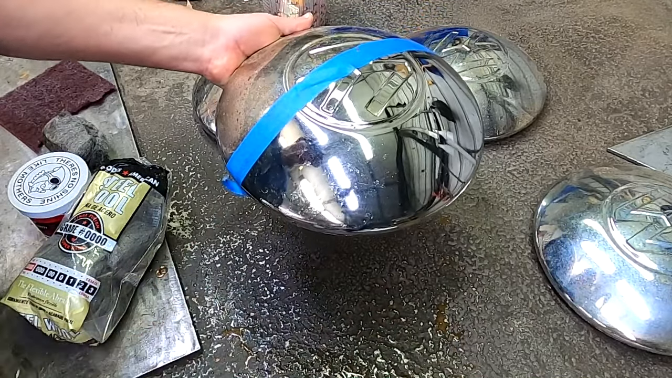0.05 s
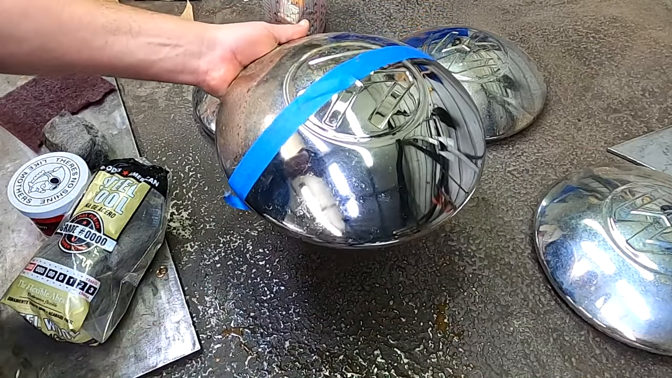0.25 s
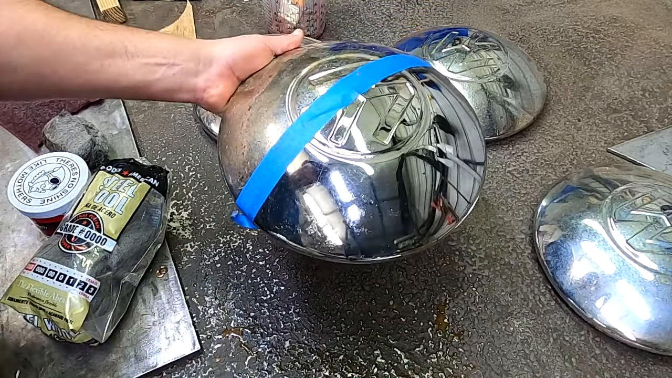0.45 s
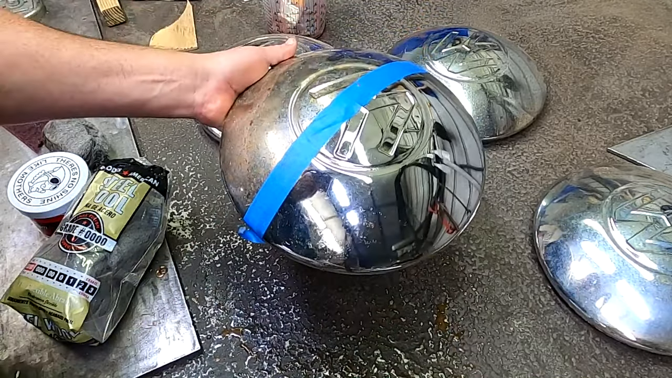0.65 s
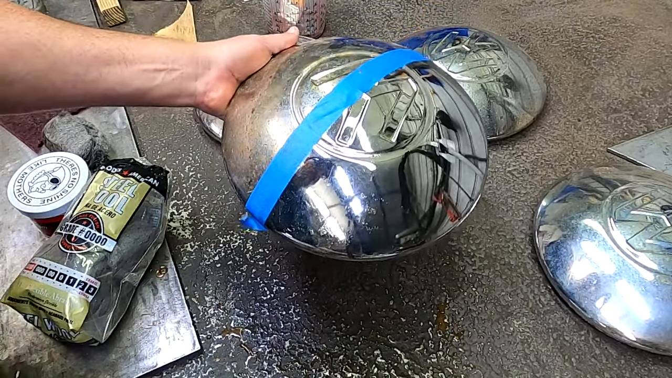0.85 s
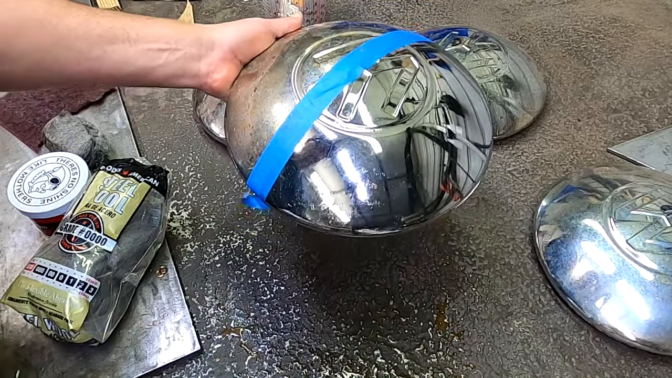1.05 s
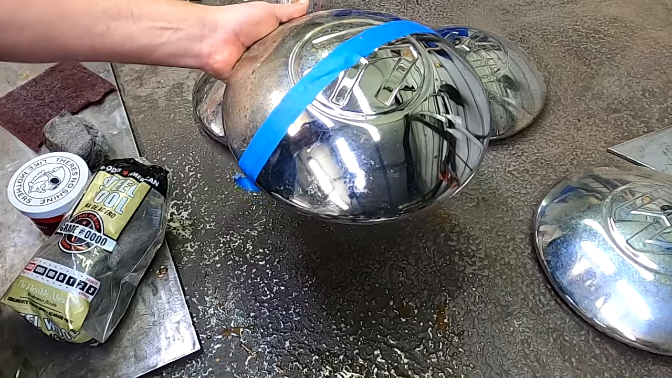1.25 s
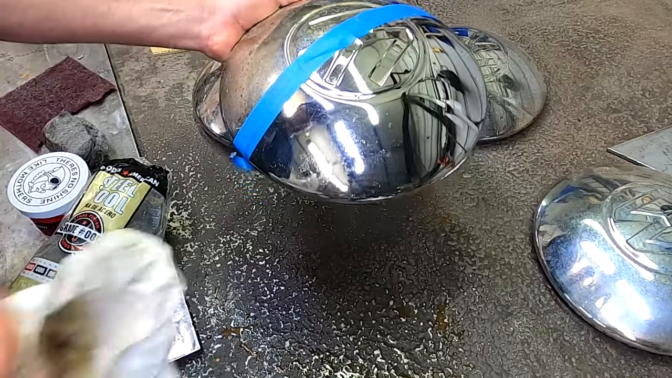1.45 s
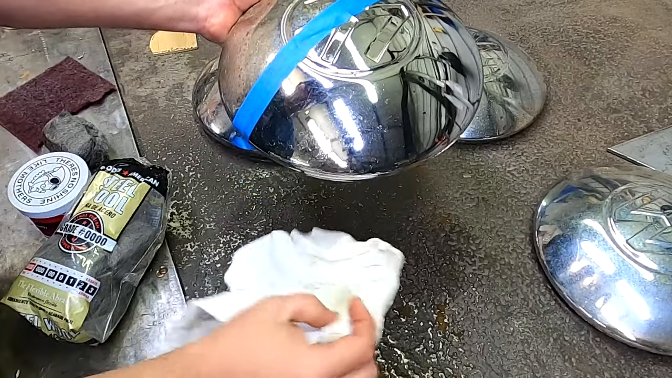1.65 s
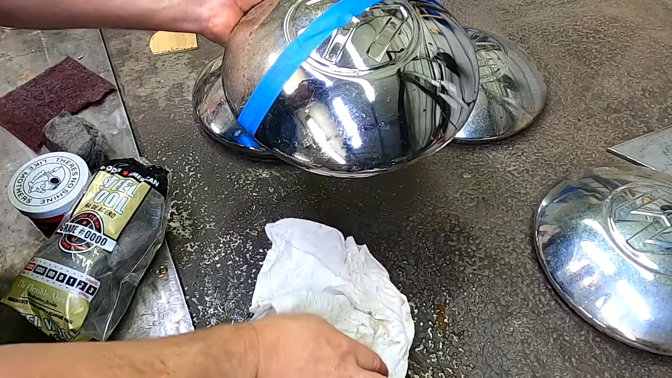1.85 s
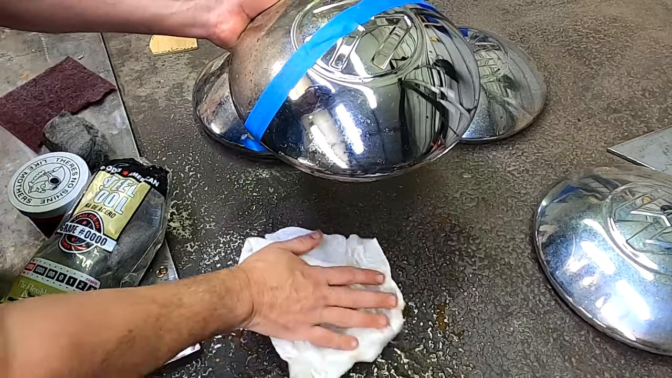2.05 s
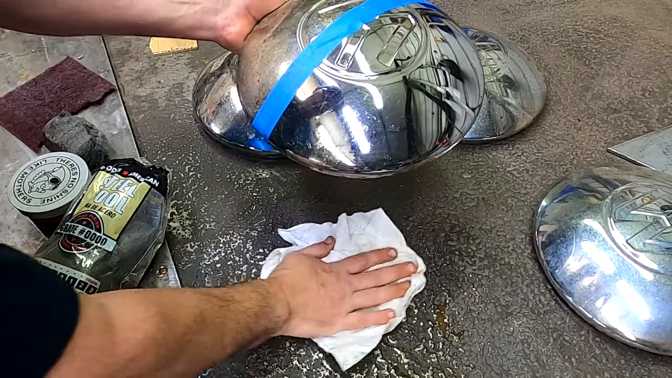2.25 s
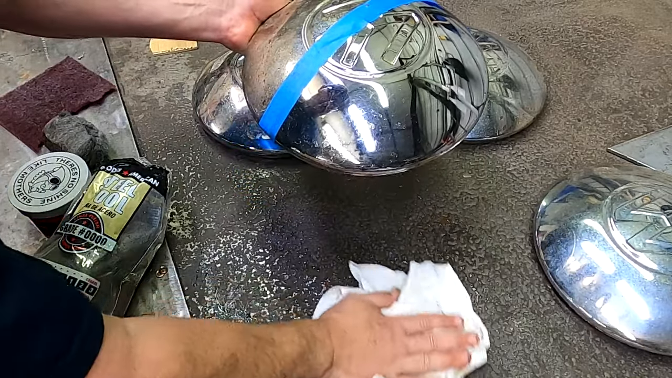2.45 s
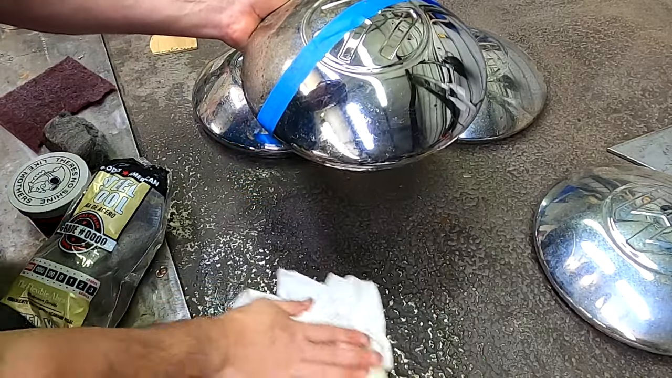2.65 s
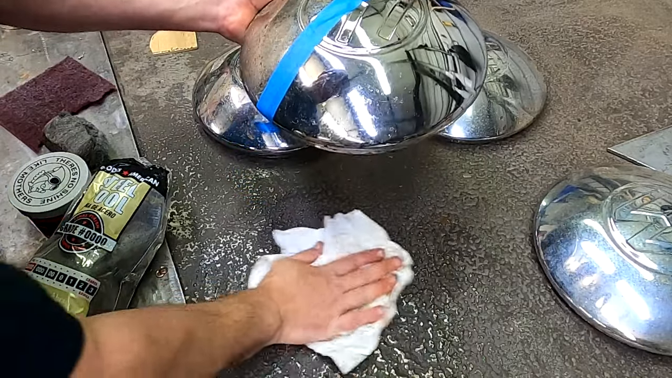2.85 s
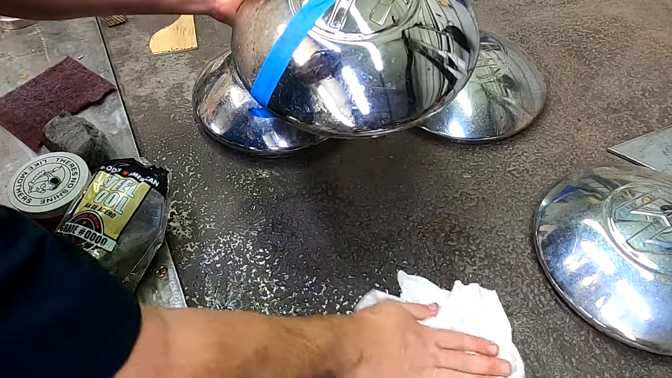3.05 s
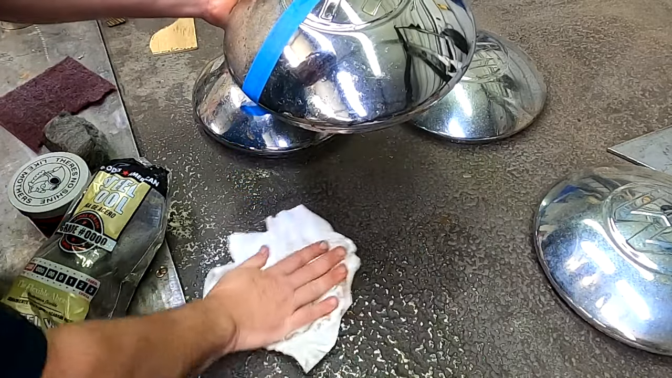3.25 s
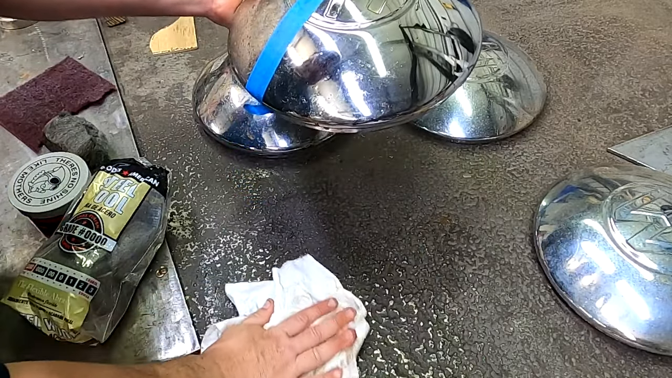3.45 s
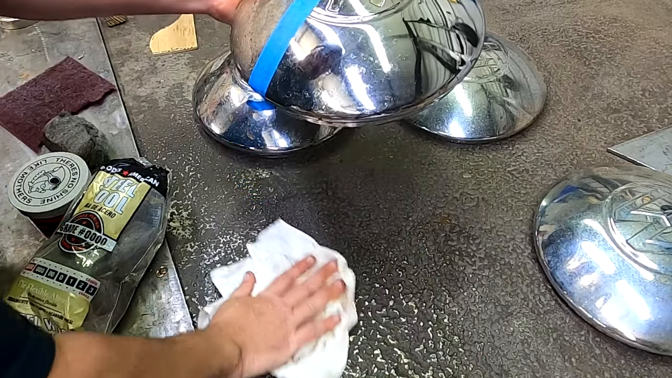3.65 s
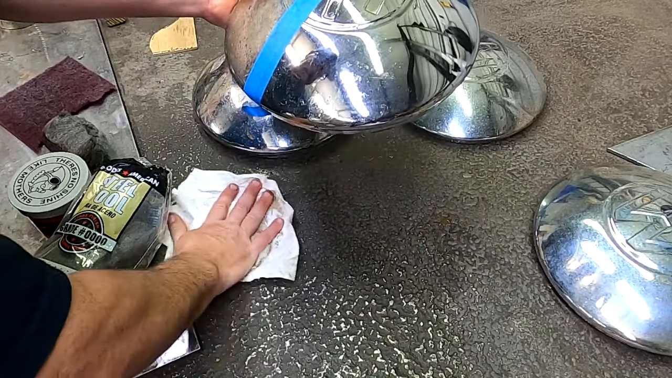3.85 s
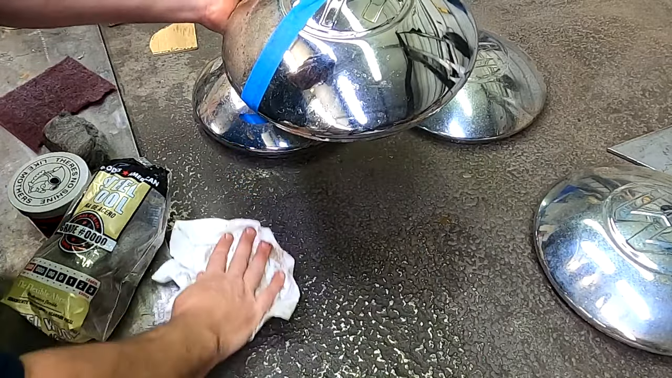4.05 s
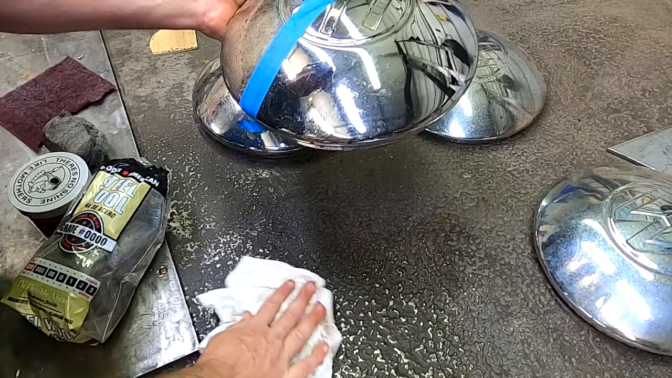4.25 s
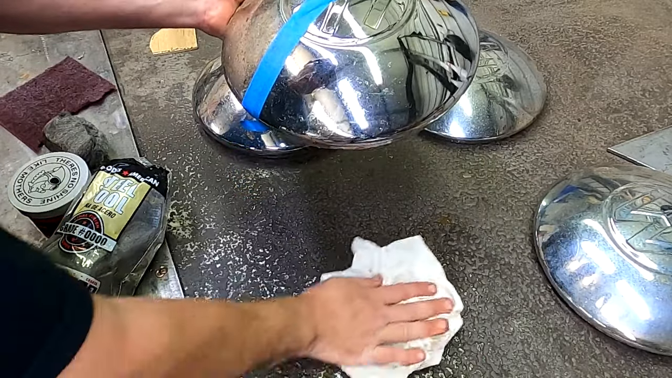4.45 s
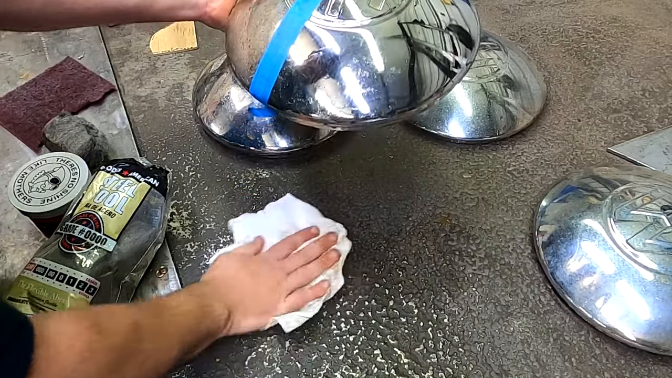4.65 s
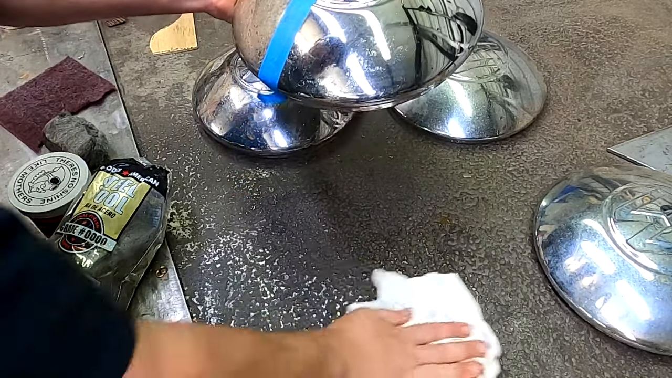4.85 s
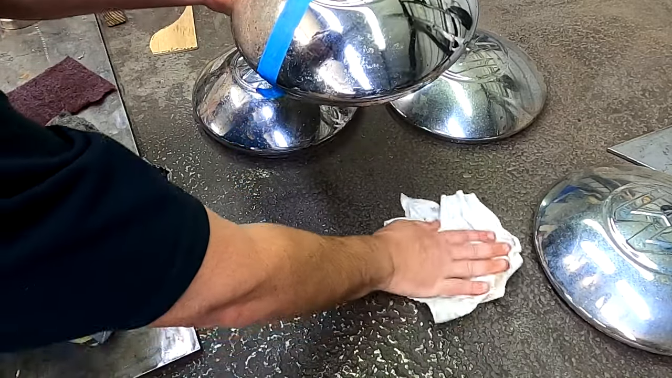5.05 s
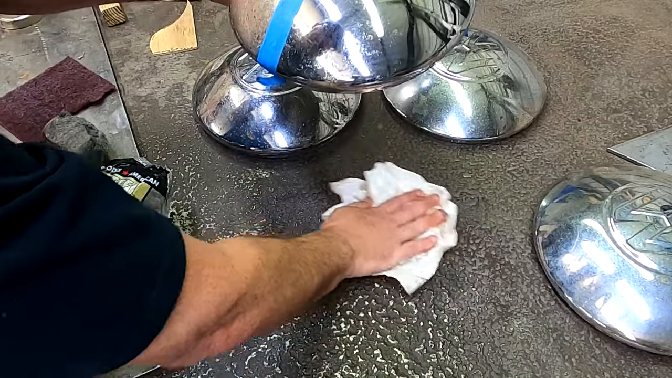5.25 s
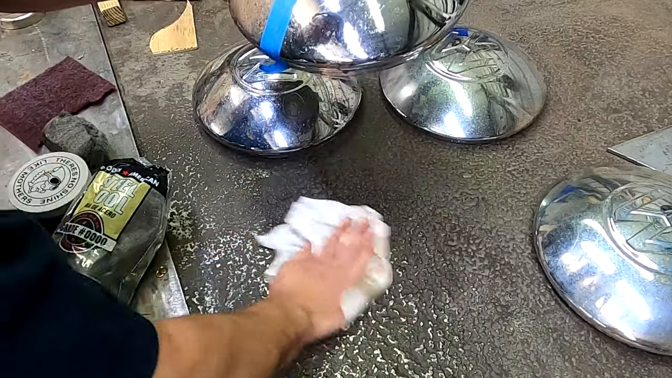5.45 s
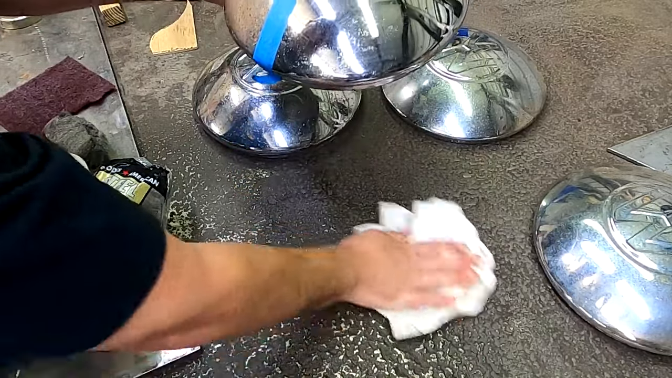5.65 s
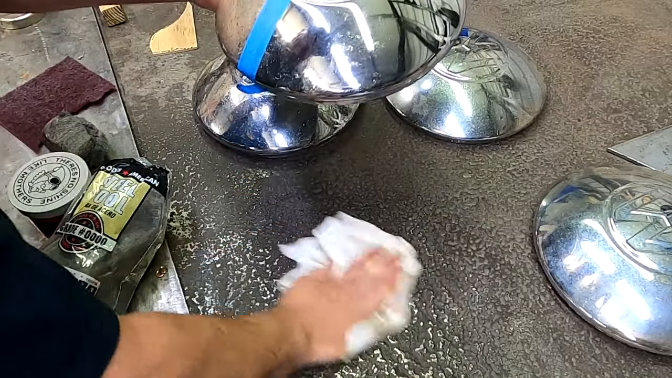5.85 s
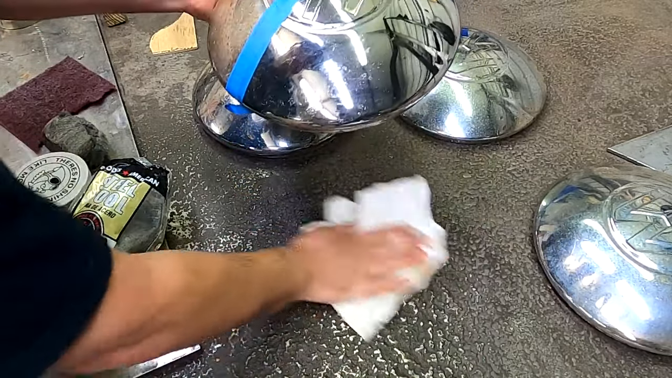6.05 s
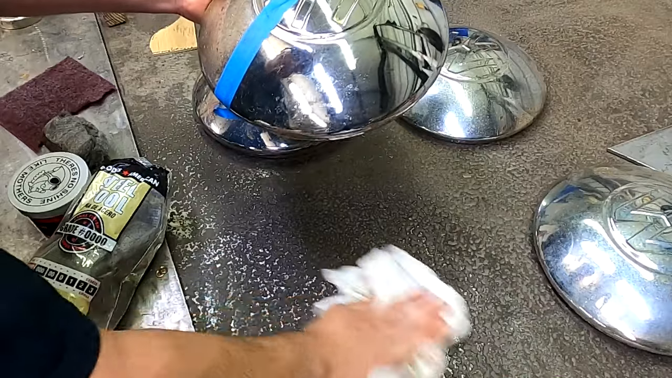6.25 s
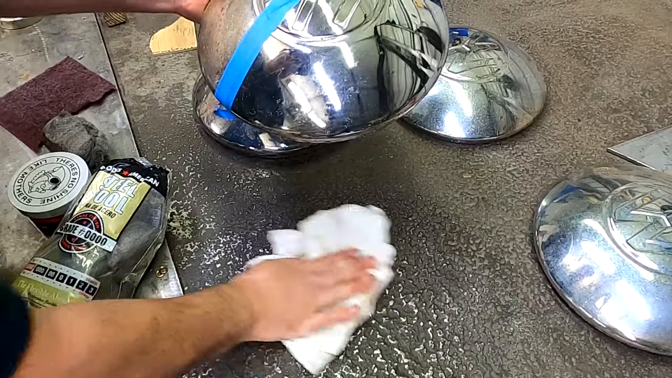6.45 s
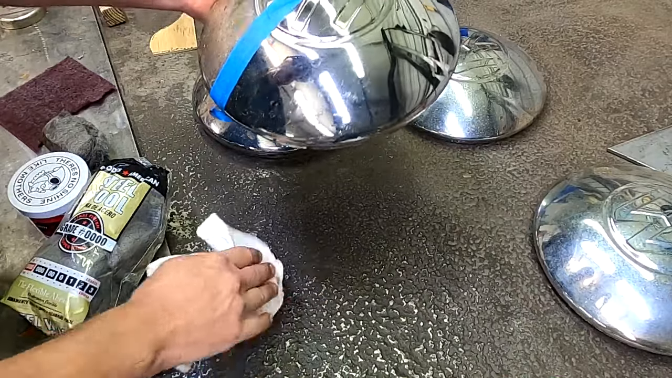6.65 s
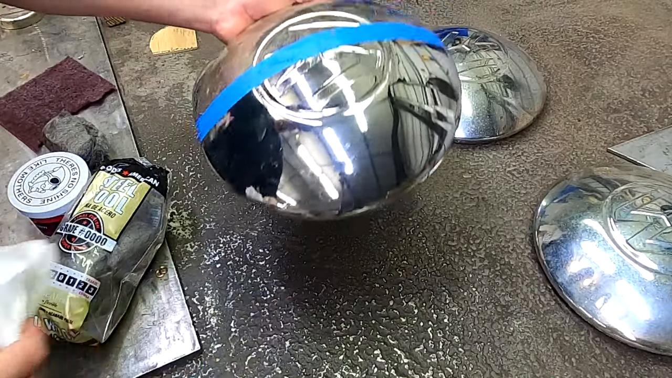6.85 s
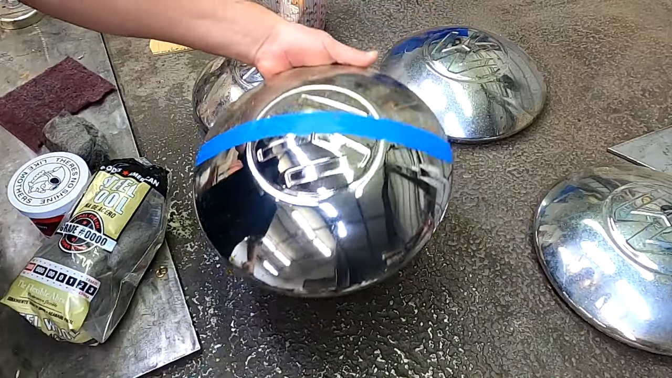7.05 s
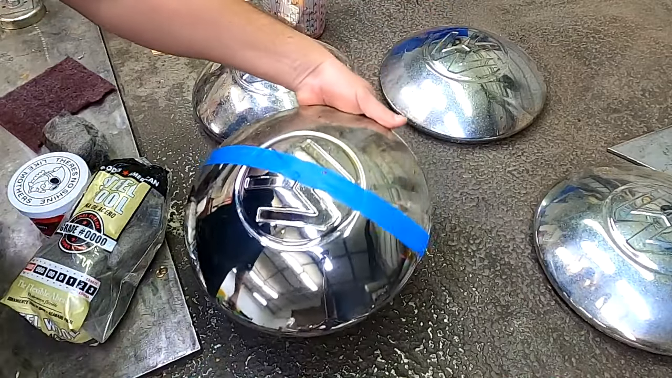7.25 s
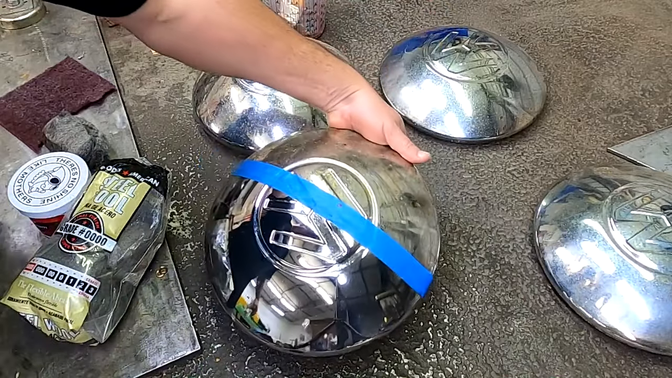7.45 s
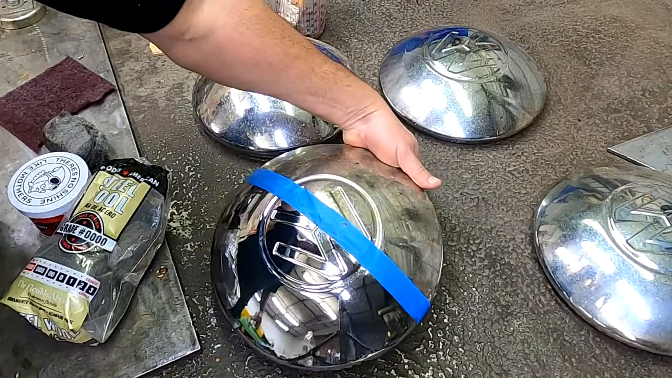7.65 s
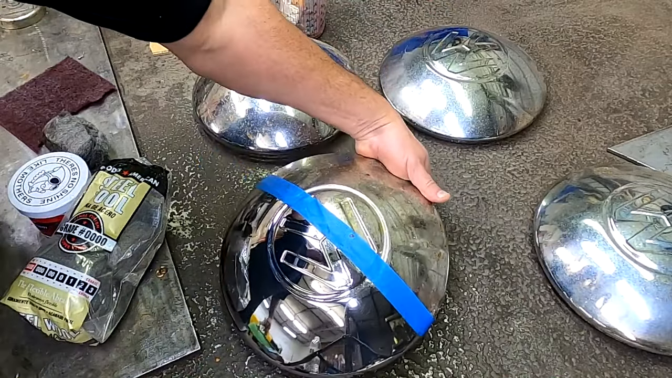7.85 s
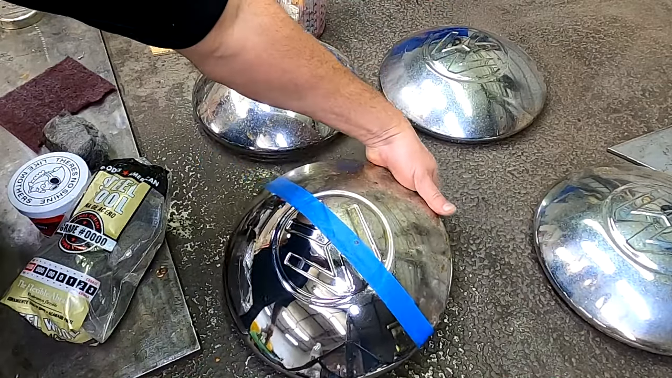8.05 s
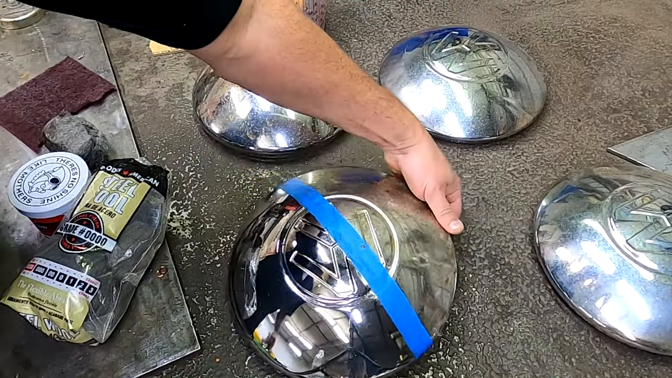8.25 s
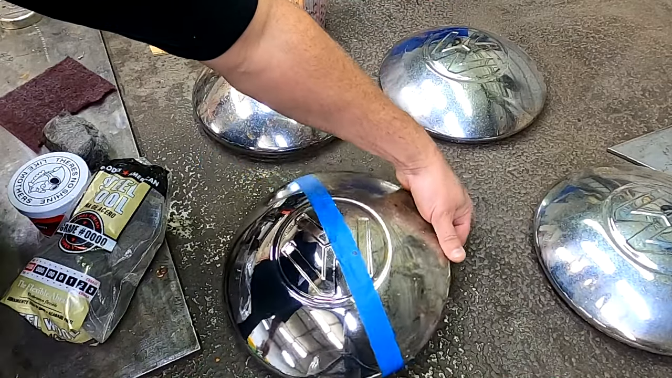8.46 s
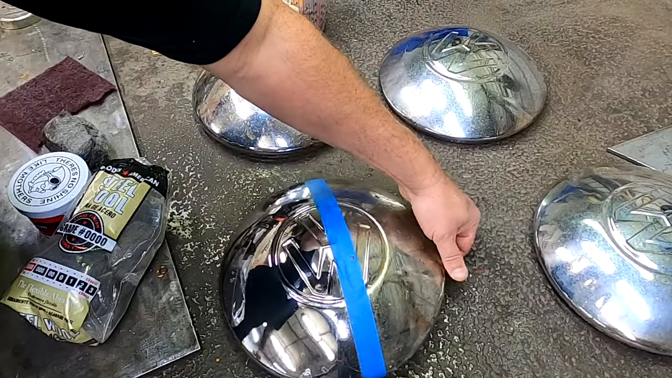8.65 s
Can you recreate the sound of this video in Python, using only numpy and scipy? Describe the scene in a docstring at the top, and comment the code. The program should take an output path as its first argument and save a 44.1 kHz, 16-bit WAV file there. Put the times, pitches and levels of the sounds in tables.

```python
"""In a quiet workshop a damp rag is unfolded, then rubbed back and forth over a wet, gritty steel table.
A steel hubcap is set down on the table, rocks on its rim and is dragged round, chattering.
Rag: patchy grains of noise coloured like cloth on grit, swelling with each stroke of the hand.
Hubcap: taps, stick-slip pulses and grit noise drive banks of resonances.
Small ticks, a knock and palm thumps join in; hum, rumble, hiss and a faint whine lie behind."""
import sys
import numpy as np
from scipy import signal
from scipy.fft import rfft, irfft, next_fast_len
from scipy.io import wavfile
from scipy.ndimage import uniform_filter1d, map_coordinates

SR = 44100
rng = np.random.default_rng(int(sys.argv[2]) if len(sys.argv) > 2 else 0)


def inscribe(sig):
    """Save sig as 16-bit PCM at rate SR to the path in sys.argv[1].

    A 1-D sig is mono; a 2-D sig holds one channel per row.
    Samples are clipped to [-1, 1] before scaling.
    """
    pcm = np.round(np.clip(np.atleast_2d(sig).T, -1, 1) * 32767)
    wavfile.write(sys.argv[1], SR, pcm.astype(np.int16))


N = 384111
TIME = np.arange(N) / SR  # seconds

# Strokes of the rag; treble and dark hiss are relative to the rubbing:
# start_s, end_s, rubbing_db, treble_db, dark_hiss_db
RAG_STROKES = [(2.174, 2.276, -54.5, 2.5, 8), (2.245, 2.563, -43.5, 5.5, -4.5),
               (2.472, 2.94, -43.5, 6.5, -1.5), (2.855, 3.18, -45, 6.5, 2), (3.158, 3.377, -42.5, 7.5, 2),
               (3.286, 3.57, -43.5, 2.5, -8), (3.515, 3.624, -36.5, 3, -15), (3.585, 3.763, -54.5, -3, -8),
               (3.68, 4.028, -46.5, 6, -7), (4.01, 4.17, -58.5, 7.5, -6), (4.078, 4.364, -47, 3, -0.5),
               (4.282, 4.486, -48.5, 8, -5), (4.374, 4.854, -43, 2, 0.5), (4.774, 5.022, -43.5, 6, -2.5),
               (4.945, 5.241, -44, 3.5, 2.5), (5.227, 5.417, -44, 2.5, 0.5), (5.326, 5.57, -43, 4.5, -2.5),
               (5.503, 5.772, -44.5, 6.5, -0.5), (5.715, 5.951, -43.5, 5.5, 5), (5.893, 6.123, -44, 7, 0),
               (6.071, 6.313, -43.5, 6, 6.5), (6.263, 6.476, -44, 7, 5.5), (6.447, 6.652, -44, 7.5, 11),
               (6.556, 6.752, -52.5, 10, 6), (6.68, 6.79, -66, 9, 6)]
# Spectrum of fibres over grit: frequency_hz, relative_density_db (per Hz)
RUB_SPECTRUM = [(290, -15.5), (500, -23), (626, -17.5), (866, -15), (956, -6.5), (1160, -5), (1340, 1.5),
                (1850, -2.5), (3490, -2), (7170, -14), (9500, -14), (12400, -25), (14500, -36)]
# Left-right likeness of rubbing and plate: frequency_hz, correlation (0-1)
RUB_LIKENESS = [(60, 0.41), (180, 0.98), (530, 0.8), (1600, 0.81), (4770, 0.87), (14200, 0.06)]
# Table top under the hand: resonance_hz, width_hz, relative_level_db
PLATE_MODES = [(170.5, 64, 2.5), (328, 86, -4.5), (640, 700, -14.5)]
ATTACK_S, RELEASE_S = 0.073, 0.084  # the hand speeds up and stops
STROKE_RISE_DB_PER_S = 1  # the rub gains level along a stroke

# The rim meets the table, driving three groups of modes: time_s, dome_push_db, rim_ring_db, skirt_ring_db
RIM_TAPS = [(8.011, 5, -4, -2), (8.023, 30.5, 24.5, 23), (8.073, 16, 6, -9), (8.097, 14, -4, 3),
            (8.202, 13.5, -23, 7), (8.242, 13.5, -1.5, -20), (8.263, 4.5, -8, -15), (8.297, 14, -1.5, -1),
            (8.316, 14, -17, -18), (8.392, 8, -11, 4), (8.43, 11.5, -8, -10), (8.4505, 16, -1, -9),
            (8.619, -2, -3, 18.5), (8.633, 6, -5, 21)]
# Stick-slip bursts of the dragged rim: start_s, end_s, drive_db, slip_rate_hz
CHATTER_BURSTS = [(8.456, 8.48, -23.5, 400), (8.468, 8.484, -25, 550), (8.479, 8.504, -10.5, 407.5),
                  (8.512, 8.528, -23, 420), (8.526, 8.538, -12.5, 544), (8.57, 8.607, -6.5, 422.4),
                  (8.614, 8.624, -4, 387), (8.62, 8.647, -10, 425.5), (8.622, 8.65, -11, 545),
                  (8.651, 8.667, -11.5, 445), (8.675, 8.686, -17, 400), (8.702, 8.728, -5.5, 425)]
# Rim over grit: time_s, drag_db, hiss_db
RIM_DRAG = [(8.03, -23, -37), (8.052, -41, -21), (8.13, -47, -44), (8.18, -52, -34), (8.372, -52, -15),
            (8.414, -38.5, -16), (8.44, -45.5, -23), (8.498, -27.5, -31), (8.52, -46, -35),
            (8.56, -35, -41), (8.628, -32.5, -41), (8.71, -48.5, -32)]
# Dome and trapped air: resonance_hz, width_hz, landing_db, dragged_db
DOME_MODES = [(298, 80, -19, -34), (356, 68, -12.5, -7.5), (413, 72, 6.5, 5.5), (504, 41, 3.5, -16),
              (509, 62, -0.5, -1.5), (700, 74, -6, -2.5)]
# Rim modes: resonance_hz, width_hz, landing_db, dragged_db
RIM_MODES = [(790, 250, -12, -38), (1560, 140, -14, -21), (1730, 31, -0.5, -9.5), (1910, 40, -9, -6.5),
             (2033, 13, -5, -4), (2262, 40, -2.5, -21), (2430, 110, -11, -8), (2900, 120, -12, -8),
             (3070, 68, -12, -4), (3268, 77, -6.5, -0.5), (3400, 35, -3, 0), (3560, 44, -2, -6),
             (3770, 62, -6, 1), (4200, 90, -13, -9), (4570, 100, -9.5, -11.5), (4900, 160, -13.5, -9),
             (5260, 99, -20, -9), (5540, 64, -17, -14), (6400, 890, -31, -34)]
# Low shell modes: resonance_hz, width_hz, landing_db, dragged_db
SKIRT_MODES = [(980, 16, 7, 13), (1078, 105, 9.5, 0.5), (1330, 200, 1, -3.5)]
SLIP_PEAK = 0.74  # where in a burst the slips are strongest (0-1)
GRIND_DB = -37  # grinding force relative to the slips
SETTLE_S, SETTLE_SPAN_S = 8.2, 0.1  # the cap tips from one edge down to flat

# Cloth rustling in the hands; brightness is relative to the body: time_s, level_db, rise_s, brightness_db
CLOTH_RUSTLES = [(0.963, -59.5, 0.017, -11), (1.1, -71, .01, -12), (1.15, -77.5, 0.046, 8.5),
                 (1.82, -65, 0.0036, -2), (1.89, -64.5, 0.029, 0), (6.782, -73, 0.0048, 20)]
FADE_S, FADE_PER_RISE = 0.19, 6.3  # t60 = FADE_S + FADE_PER_RISE * rise: slow swells linger
# Hollows under the peeling cloth open and drop in pitch: start_hz, end_hz, level_db
PEEL_TONES = [(2750, 1300, -63), (4100, 3300, -64)]
PEEL_S, PEEL_SPAN_S = 6.779, 0.06  # start and length
# Palm leaning on the table: time_s, level_db
PALM_THUMPS = [(1.085, -55), (1.899, -52.5), (3.067, -50.5), (3.259, -48.5), (4.924, -50), (5.633, -50),
               (5.813, -47.5), (6.011, -43), (6.159, -44.5), (6.389, -45.5), (6.529, -53)]
UPPER_DB = -6  # upper plate modes under a thump
# Small ticks, louder on the left: time_s, relative_level_db, pitch_hz
SMALL_TICKS = [(0.8205, -60, 2200), (0.9774, -58.5, 2800), (1.0969, -58, 1930), (1.3056, -60, 2280)]
TICK_T60_S = 0.016
# A light knock with a softer strike just before and after it: time_s, relative_level_db
KNOCKS = [(0.503, -42), (0.5125, -25.5), (0.529, -39)]
# Colour of the knock: frequency_hz, relative_density_db (per Hz)
KNOCK_SPECTRUM = [(300, -9), (402, -38), (480, -5), (529, -19), (1010, -7), (3900, -6), (9980, -11.5),
                  (14500, -33.5)]

# Treble balance of the table sounds: frequency_hz, left_minus_right_db
TABLE_BALANCE = [(500, -0.2), (4000, 1.35), (12000, -1.5)]
LEFT_LAG_S = 1.5 / SR  # near sounds reach the left channel a little later
# Room decay: frequency_hz, t60_s
WALL_DECAY = [(200, 0.056), (1500, 0.5), (5000, 0.18), (12000, 0.023)]
# Workshop hum and hiss: frequency_hz, relative_density_db (per Hz)
SHOP_SPECTRUM = [(12, -50), (20, -19), (54, -4.5), (96, -16), (165, -9), (208, -7), (274, -24), (351, -20),
                 (476, -27), (719, -36), (1210, -34.5), (1600, -38), (3860, -46), (6890, -48.5),
                 (14500, -67)]
# Left-right likeness of the workshop: frequency_hz, correlation (0-1)
SHOP_LIKENESS = [(60, 0.97), (240, 0.64), (920, 0.4), (3630, 0.43), (14200, 0.11)]
# Deepest rumble before its surges: time_s, base_level_db
RUMBLE_LEVEL = [(0, -62.5), (1.3, -60.5), (1.62, -63), (2.1, -54), (2.7, -60.5), (3.9, -64), (4.6, -68.5),
                (6.3, -62.5), (7.1, -59), (8.1, -61), (8.71, -86)]
# Faint hiss against SHOP_DB: time_s, relative_level_db
AIR_LEVEL = [(0, 1), (.2, -2.5), (.48, -3.5), (.7, 1.5), (.9, -.5), (1.15, 1.5), (2.1, -.5), (6.9, 1),
             (7.2, -.5), (7.35, -3.5), (8.71, -2)]
# Fuzzy distant whine: time_s, level_db
WHINE_LEVEL = [(0, -82), (.3, -75), (.45, -87), (1, -81), (1.4, -80), (1.6, -86), (2, -84), (7.1, -83),
               (7.25, -92)]
SHOP_DB = -54  # reference for hum and hiss
WHINE_HZ, WHINE_WIDTH_HZ = 1130, 240
TOP_HZ = 14800  # upper band limit


def amp(db):
    """Decibels to linear gain."""
    return 10 ** (np.asarray(db) / 20)


def unit(x):
    """Scales a sound to an rms of 1."""
    return x / np.sqrt(np.mean(x ** 2) + 1e-20)


def along(points, hz):
    """Reads (Hz, value) points along a log frequency axis."""
    f, v = np.transpose(points)
    return np.interp(np.log(hz + 1), np.log(f + 1), v)


def curves(rows):
    """One value per sample for each column; the first, a level, is silent outside the table."""
    s, db, *others = np.transpose(rows)
    return [np.interp(TIME, s, db, -200, -200)] + [np.interp(TIME, s, c) for c in others]


def wobble(rate):
    """A smooth random curve with rate knots a second."""
    knots = rng.standard_normal(int(N * rate / SR) + 4)
    return map_coordinates(knots, [TIME * rate])


def filtered(x, response):
    """Shapes x with a complex response of frequency."""
    m = next_fast_len(N + SR // 2)
    return irfft(rfft(x, m) * response(np.fft.rfftfreq(m, 1 / SR)), m)[..., :N]


def modes(table):
    """Causal response of (Hz, width, dB) resonances, alternating in sign."""
    def response(f):
        return sum((-1) ** k * amp(db) * 1j * f * w / (c * c - f * f + 1j * f * w)
                   for k, (c, w, db) in enumerate(table))
    return response


def grit(grain_db, patchy_db):
    """Two unrelated noises of uneven grains that share time-frequency patches of random gain."""
    grains = rng.standard_normal((2, N)) * amp(grain_db * wobble(2500))
    z = signal.stft(grains, nperseg=512)[2]
    field = rng.standard_normal(z.shape[1:])
    field = uniform_filter1d(field, size=6, axis=0)
    field = uniform_filter1d(field, size=10, axis=1)
    return signal.istft(z * amp(patchy_db * unit(field)), nperseg=512)[1][:, :N]


def spread(pair, gain, alike):
    """Colours a noise pair and blends it to left and right of the given likeness, at rms 1."""
    def mid_side(hz):
        turn = np.arccos(np.clip(along(alike, hz), -1, 1)) / 2
        return gain(hz) * [np.cos(turn), np.sin(turn)]
    mid, side = filtered(pair, mid_side)
    return unit(np.array([mid + side, mid - side]))


def rag():
    """Fibres hiss over the wet grit; bunched folds sound darker; the plate hums faintly."""
    rub, bright_rub, dark_rub = strokes()
    body, bright = fibres(grain_db=0.35, patchy_db=1.44, split_hz=3450)
    dark = filtered(body, lambda hz: 1 / (1 + (hz / 1200) ** 8))
    hiss = rub * (body - dark) + dark_rub * dark + bright_rub * bright
    plate = spread(rng.standard_normal((2, N)), modes(PLATE_MODES), RUB_LIKENESS)
    plate_gain = amp(-27.0 + 5.5 * wobble(7.8))
    return hiss + plate_gain * rub * plate


def strokes():
    """Gains of body, treble and dark hiss; strokes overlap where the hand turns without stopping."""
    power = np.zeros((3, N))
    for start, end, db, bright_db, dark_db in RAG_STROKES:
        at = slice(round(start * SR), round(end * SR))
        t = TIME[at]
        speed = np.clip((t - start) / ATTACK_S, 0, 1) * np.clip((end - t) / RELEASE_S, 0, 1)
        level = amp(db + STROKE_RISE_DB_PER_S * (t - start))
        power[:, at] += (speed * level * amp([[0], [bright_db], [dark_db]])) ** 2
    return np.sqrt(power)


def fibres(grain_db, patchy_db, split_hz):
    """Cloth friction, split into its body and its bright part."""
    rub = spread(grit(grain_db, patchy_db), lambda hz: amp(along(RUB_SPECTRUM, hz)), RUB_LIKENESS)
    bright = filtered(rub, lambda hz: 1 / (1 + (split_hz / (hz + 1)) ** 4))
    return rub - bright, bright


def hubcap():
    """Taps and slips drive the dome, taps ring rim and skirt; grit keeps the shell modes sounding."""
    push, tick, jolt = taps()
    slips, swell = chatter()
    drag_db, hiss_db = curves(RIM_DRAG)
    # the touching point wanders round the rim, so modes come and go; slips grind harder
    force = amp(drag_db + 1.8 * wobble(60)) + swell
    grains = grit(grain_db=3, patchy_db=3.5)
    rough, fine = force * grains

    soft = lambda hz: 1 / (1 + 1j * hz / 950) ** 2  # a rounded contact dulls the blow
    hard = lambda hz: 1 / (1 + 1j * hz / 6000) ** 2
    dome_force = filtered(push, soft) + slips + amp(16.5) * fine + amp(5) * grains[0] * swell
    dome = shell(dome_force, DOME_MODES)
    rim = shell(filtered(tick, hard) + amp(14.0) * rough, RIM_MODES)
    scrape = amp(-5) * filtered(fine, lambda hz: modes([(3000, 3600, 0)])(hz) ** 2)
    skirt = shell(filtered(jolt, soft) + amp(1.0) * fine, SKIRT_MODES)
    hiss_tone = lambda hz: modes([(7500, 4600, 0)])(hz) / (1 + (hz / 10500) ** 6)
    hiss = filtered(amp(hiss_db) * fine, hiss_tone)
    return dome + rim + scrape + skirt + hiss


def taps():
    """Each contact is a single impulse of its own strength for dome, rim and skirt."""
    push, tick, jolt = np.zeros((3, N))
    for s, push_db, ring_db, skirt_db in RIM_TAPS:
        i = round(s * SR)
        push[i], tick[i], jolt[i] = amp(push_db), amp(ring_db), amp(skirt_db)
    return push, tick, jolt


def chatter():
    """The rim sticks and slips: rounded pulses at the slip rate, with a swell of grinding force."""
    slips, swell = np.zeros((2, N))
    for start, end, db, hz in CHATTER_BURSTS:
        at = slice(round(start * SR), round(end * SR))
        t = TIME[at] - start
        ramp = np.interp(t / (end - start), [0, SLIP_PEAK, 1], [0, 1, 0])
        shape = amp(db) * np.sin(np.pi / 2 * ramp)
        swell[at] += amp(GRIND_DB) * shape
        slips[at] += shape * np.maximum(np.cos(2 * np.pi * hz * t), 0) ** 2
    return slips, swell


def shell(force, table):
    """A force rings the cap, whose modes weigh differently once it has settled."""
    flat = np.clip((TIME - SETTLE_S) / SETTLE_SPAN_S, 0, 1)
    hz, width, landing_db, dragged_db = np.transpose(table)
    landing = filtered((1 - flat) * force, modes(zip(hz, width, landing_db)))
    dragged = filtered(flat * force, modes(zip(hz, width, dragged_db)))
    return landing + dragged


def rustles():
    """Folds of cloth slide: each swells, then dies away."""
    body, bright = fibres(grain_db=3, patchy_db=.5, split_hz=3200)
    body_shape, bright_shape = np.zeros((2, N))
    for s, db, rise, bright_db in CLOTH_RUSTLES:
        t60 = FADE_S + FADE_PER_RISE * rise
        swell = np.exp(-((TIME - s) / rise) ** 2)
        fade = amp(-60 * np.abs(TIME - s) / t60)
        shape = amp(db) * np.where(TIME < s, swell, fade)
        body_shape += shape
        bright_shape += amp(bright_db) * shape
    return body_shape * body + bright_shape * bright


def lift():
    """The wet rag peels off the plate: narrow bands of noise slide down in pitch."""
    u = np.clip((TIME - PEEL_S) / PEEL_SPAN_S, 0, 1)
    shape = np.sin(np.pi * np.sqrt(u))
    peel = np.zeros(N)
    for from_hz, to_hz, db in PEEL_TONES:
        fuzz = unit(filtered(rng.standard_normal(N), lambda hz: 1 / (1 + (hz / 200) ** 2)))
        phase = 2 * np.pi * np.cumsum(from_hz + (to_hz - from_hz) * u) / SR
        peel += amp(db) * shape * fuzz * np.cos(phase)
    return peel


def thumps():
    """Soft pushes of the palm shake the plate for a moment."""
    lean, upper = np.zeros((2, N))
    for s, db in PALM_THUMPS:
        u = np.maximum(TIME - s, 0) / 0.024  # lean peaks after 24 ms
        lean += amp(db) * u * np.exp(1 - u)
        upper += amp(db + UPPER_DB) * u * np.exp(1 - u / 0.76)
    deep = lambda hz: modes(PLATE_MODES[:1])(hz) ** 2  # squared: the lowest mode stands well clear
    low = spread(rng.standard_normal((2, N)), deep, RUB_LIKENESS)
    high = spread(rng.standard_normal((2, N)), modes(PLATE_MODES[1:]), RUB_LIKENESS)
    return lean * low + upper * high


def knock():
    """Short cracks of coloured noise without a ring, and a rustle that dies away after them."""
    shape = np.zeros(N)
    for s, db in KNOCKS:
        t = np.abs(TIME - s)
        crack = amp(db - 60 * t / 0.041)
        rustle = amp(db - 8.0 - 60 * t / 0.27)
        shape += (crack + rustle) * (TIME >= s)
    noise = filtered(rng.standard_normal(N), lambda hz: amp(along(KNOCK_SPECTRUM, hz)))
    return amp(-11.5) * shape * unit(noise)


def ticks():
    """Tiny dry clicks: decaying noise with a hint of pitch."""
    s, db, hz = np.transpose(SMALL_TICKS)[..., None]
    t = TIME - s
    ring = np.sin(2 * np.pi * hz * t) + 0.6 * rng.standard_normal(N)
    return np.sum((t >= 0) * amp(db - 60 * np.abs(t) / TICK_T60_S) * ring, axis=0)


def walls(x):
    """A short noise tail answers; each frequency of it dies at its own speed."""
    hz, t, z = signal.stft(rng.standard_normal((2, SR // 2)), SR, nperseg=256)
    decay = amp(-60 * t / along(WALL_DECAY, hz)[:, None])
    tail = signal.istft(z * decay, SR, nperseg=256)[1]
    late = np.pad(x, (300, 0))[None]  # the answer starts 300 samples later
    return signal.fftconvolve(late, tail / np.linalg.norm(tail[0]), axes=1)[:, :N]


def shop():
    """Distant machines and air: lumpy hum, wandering rumble, faint hiss and a whine, all from noise."""
    air = spread(grit(grain_db=1.6, patchy_db=-1), lambda hz: amp(along(SHOP_SPECTRUM, hz)), SHOP_LIKENESS)
    deep = filtered(air, lambda hz: 1 / (1 + (hz / 115) ** 8))
    hum = filtered(air, lambda hz: 1 / (1 + (hz / 270) ** 8)) - deep
    hiss = air - deep - hum
    whine = unit(filtered(air, lambda hz: modes([(WHINE_HZ, WHINE_WIDTH_HZ, 0)])(hz) ** 2))

    surge_db = 2.8 * wobble(5)  # hum and rumble swell together
    lows = amp(SHOP_DB - 4.0 + surge_db) * hum
    # the rumble leans left
    lows = lows + amp(curves(RUMBLE_LEVEL)[0] + surge_db) * unit(deep) * amp([[.8], [-.8]])
    return lows + amp(SHOP_DB + curves(AIR_LEVEL)[0]) * hiss + amp(curves(WHINE_LEVEL)[0]) * whine


def scene():
    """Places the near sounds left to right, then adds the room's answer and the workshop."""
    cap, rap = hubcap(), knock()
    near = rag() + thumps() + rustles() + lift() + cap
    near = near + ticks() * amp([[2], [-2]]) + rap * amp([[1.5], [-1.5]])  # both lean left

    def placing(hz):
        balance = amp(np.outer([.5, -.5], along(TABLE_BALANCE, hz)))
        return balance * np.exp(np.outer([-1j, 1j], np.pi * hz * LEFT_LAG_S))
    return filtered(near, placing) + amp(-12) * walls(cap) + amp(-5.0) * walls(rap) + shop()


def record(dry):
    """Keeps nothing above the band limit."""
    return filtered(dry, lambda hz: hz < TOP_HZ)


dry = scene()
out = record(dry)
inscribe(out)
```